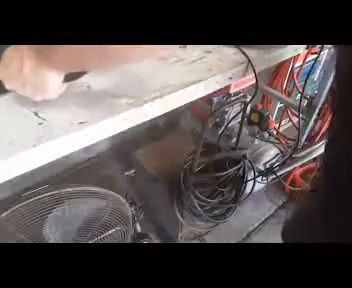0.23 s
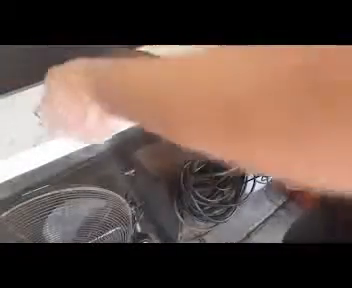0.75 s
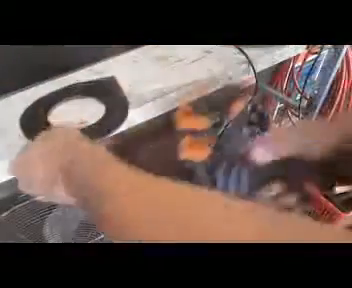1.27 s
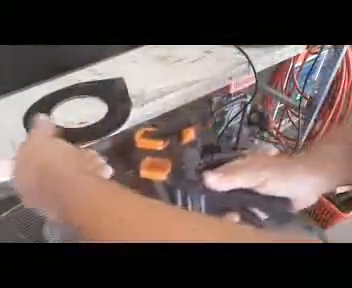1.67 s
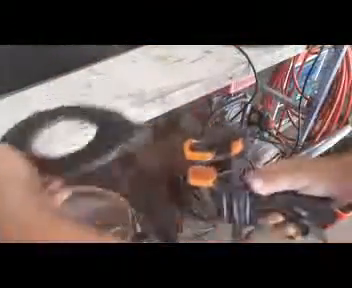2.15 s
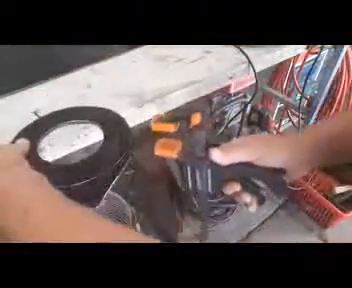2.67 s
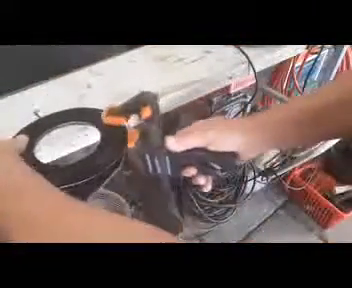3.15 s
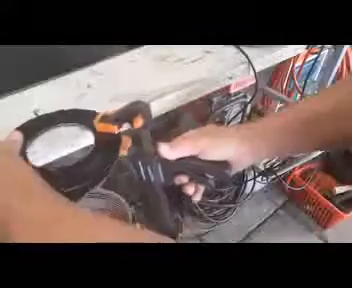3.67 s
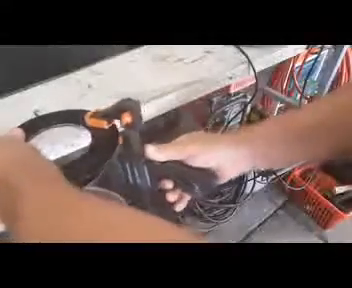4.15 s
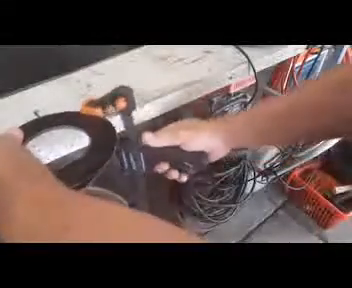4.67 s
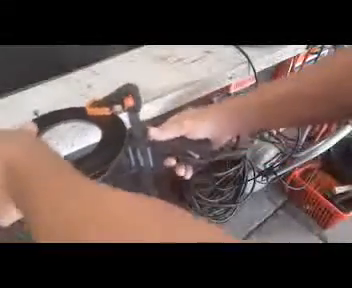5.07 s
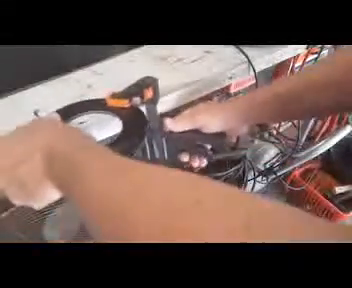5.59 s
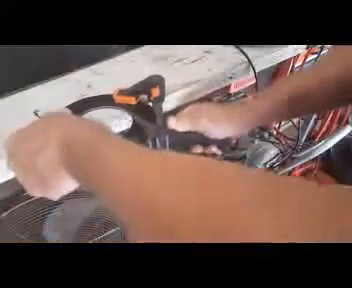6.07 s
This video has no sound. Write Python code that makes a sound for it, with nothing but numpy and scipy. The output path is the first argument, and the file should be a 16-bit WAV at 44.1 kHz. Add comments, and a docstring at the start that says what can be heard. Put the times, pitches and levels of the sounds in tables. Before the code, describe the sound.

Short juddering metal scrape with a squeal, scattered clamp clicks and bench knocks, one loud jaw snap, then soft rubs over faint hum and bird chirps.

```python
"""Metal plate and clamp on a workbench

A cut metal plate is dragged over a wooden bench: shaped noise makes its rasp and grit, slip cycles its judder,
and sine waves at its own pitches its squeal. A plastic bar clamp clicks, slides and snaps shut: short noise
bursts set the metal ringing, and the bench answers with thuds and a boom. The small workshop rings briefly;
wavering sine waves hum like a motor, air hisses softly, and a bird chirps outside in rising tones.
"""
import sys
import numpy as np
from scipy import signal
from scipy.fft import rfft, irfft, next_fast_len
from scipy.io import wavfile
from scipy.ndimage import uniform_filter1d

SR = 44100
rng = np.random.default_rng(int(sys.argv[2]) if len(sys.argv) > 2 else 0)


def wav_record(signal):
    """Record a signal, one row per channel, as 16-bit PCM in the file named by sys.argv[1]."""
    frames = np.transpose(np.atleast_2d(signal))
    bounded = np.clip(frames, -1, 1)
    # unit amplitude maps onto the largest positive 16-bit level
    quanta = np.round(bounded * 32767).astype(np.int16)
    wavfile.write(sys.argv[1], SR, quanta)


N = 279153
TIME = np.arange(N) / SR  # seconds
HIT_SIZE = 16384  # samples in one hit

# Levels in the tables are those of each source before scene() mixes and pans it.
# plate dragged over the bench; RASP_DB and GRIT_DB are added: [time_s, rasp_level_db, grit_level_db]
PLATE_DRAG = [(0.0, -45.5, -45), (0.068, -45, -45), (0.078, -35, -42), (0.108, -49, -54.5),
              (0.204, -45, -52), (0.228, -55.5, -56.5), (0.298, -58.5, -56), (0.312, -42, -51),
              (0.46, -77.5, -82)]
# moments when the dragged plate sticks and slips: [start_s, strongest_s, end_s, level_db, slips_per_s]
PLATE_JUDDERS = [(-.1, 0.1, 0.14, -33.5, 238), (0.089, 0.096, 0.13, -33.5, 710),
                 (0.112, 0.13, 0.16, -34, 680), (0.097, 0.18, 0.34, -44.5, 232),
                 (0.3, 0.322, 0.375, -43.5, 850), (.33, 0.367, 0.46, -50.5, 239)]
# the plate's own pitches: [pitch_hz, rubbed_level_db, squealing_level_db, fall_by_60_db_s]
PLATE_MODES = [(244, -16, -30, 0.29), (394, -5.5, -45, 0.15), (670.4, -5, -19, 0.34),
               (817.5, 2.5, -15.5, 0.4), (907, -5.5, 1.5, 0.78), (1304, -5.5, -27, 0.44),
               (1740, -12, -31, 0.28), (2190, 2.5, -8.5, 0.25), (2510, -15, -20, 0.15),
               (2860, -10, -22, 0.28), (3276, -9, -10, 0.2), (3510, -14, -20, .2), (3900, -6.5, -19, 0.17),
               (4660, -19, -37, .2), (5130, -12, -37, 0.13)]
# the edge catches and squeals; mode levels are added: [start_s, let_go_s, level_db]
EDGE_SQUEAL = (0.16, .2, -34.3)
# sharp clicks of clamp and plate: [start_s, clack_peak_db, tick_level_db]
SHARP_CLICKS = [(.279, -40, -44.5), (.927, -29, -37), (1.021, -45, -55), (1.046, -32.5, -41),
                (1.072, -38, -39.5), (1.103, -39.5, -49), (1.187, -48, -52), (1.42, -48, -58),
                (1.966, -33.5, -43.5), (2.014, -38.5, -51), (2.102, -45.5, -52), (2.195, -33, -38),
                (2.583, -48, -52.5), (3.045, -35.5, -59), (3.059, -37.5, -46.5), (3.579, -50.5, -72)]
# duller knocks against the bench: [start_s, clack_peak_db, thud_level_db]
BENCH_KNOCKS = [(.304, -34, -45.5), (1.238, -36.5, -46.5), (1.422, -43, -57.5), (2.27, -39, -53),
                (2.297, -35.5, -46.5), (2.447, -21.5, -42), (2.541, -29, -43), (2.591, -37.5, -45.5),
                (2.951, -49, -59), (3.246, -56, -51.5), (3.278, -43, -46), (3.64, -55, -55),
                (3.815, -62, -54), (3.853, -57, -58), (4.109, -60, -58), (4.487, -36, -41.5),
                (4.705, -38.5, -46.5), (4.772, -62, -47), (4.861, -58, -49.5), (5.597, -64.5, -61),
                (5.845, -53, -51), (5.963, -51, -50.5), (6.289, -41, -44.5)]
# sliding strokes: [start_s, hardest_s, end_s, rub_level_db, hiss_level_db, sliding_part]
SLIDING_STROKES = [(.6, 0.638, 0.69, -72, -75, "plate"), (.92, .945, 1.02, -56, -60, "bar"),
                   (.96, 1.11, 1.3, -55, -57, "bar"), (1.28, 1.335, 1.5, -65, -69, "bar"),
                   (1.868, 1.956, 2.13, -65.5, -65, "pad"), (2.095, 2.17, 2.225, -52.5, -45.5, "plate"),
                   (2.19, 2.262, 2.3, -55.5, -52, "plate"), (2.3, 2.43, 2.58, -63, -69, "plate"),
                   (2.6, 2.678, 2.83, -71, -82, "pad"), (3.613, 3.676, 3.97, -84, -69.5, "pad"),
                   (3.99, 4.15, 4.5, -75, -75.5, "pad"), (4.305, 4.35, 4.388, -62, -57, "pad"),
                   (4.338, 4.354, 4.37, -46, -39.5, "pad"), (4.668, 4.705, 4.73, -59, -67, "pad"),
                   (5.014, 5.136, 5.23, -56, -61.5, "pad"), (5.422, 5.453, 5.59, -74, -70.5, "pad"),
                   (5.723, 5.805, 6.01, -65, -74, "pad"), (6.125, 6.28, 6.45, -67, -68.5, "pad")]
# the clamp snaps shut: [start_s, crack_level_db, clatter_level_db, boom_level_db]
JAW_SNAP = (4.3603, -20, -28.5, -26.5)
# the bench top's own pitches: [pitch_hz, level_db, fall_by_60_db_s]
BENCH_MODES = [(121.5, 2.5, 0.2), (176.4, -8.5, 0.36), (241.5, -5, 0.12), (348, -8, 0.24),
               (462, -16, 0.098), (700, -5, 0.074), (754, -2.5, 0.052), (850, -11.5, 0.18), (975, -14, 0.2),
               (1340, -36, 0.2), (1630, -33, 0.22)]
# the own pitches of the clamp's steel bar: [pitch_hz, level_db, fall_by_60_db_s]
BAR_MODES = [(935, 4.5, 0.35), (1504, -3, 0.14), (1750, -3, 0.15), (2270, 1.5, 0.1), (2380, -13, 0.16),
             (2840, -16, 0.49), (3060, 8, 0.13), (3750, -5, 0.14), (3920, -5, 0.14), (4360, -18, 0.12),
             (6330, -8, 0.13), (6850, -6, 0.12)]
# bird calls, before the direct sound and its echoes are blended: [start_s, level_db]
BIRD_CALLS = [(.872, -65), (1.265, -58), (1.476, -62.5), (3.36, -64.5), (4.228, -61), (5.213, -64.5),
              (6.148, -59)]
# spells of a thin distant hiss, around which the level wanders: [start_s, end_s, level_db]
HISS_SPELLS = [(1.493, 2.1, -84.5), (2.1, 2.95, -78.5), (3.82, 4.4, -81), (5.43, 5.95, -77)]
# motor hum, around which the level wanders: [pitch_hz, level_db]
MOTOR_HUM = [(49.5, -72.5), (59, -76.5), (120, -79.5), (181, -77.5), (226, -82.5)]

# Tone colours, each with the columns [frequency_hz, level_db_per_hz]
# thud of the bench
THUD_COLOUR = [(50, -43), (90, -10), (125, 1.5), (180, -0.5), (260, -1), (400, -5.5), (600, -15.5),
               (1200, -46)]
# clack of a sharp click
CLICK_COLOUR = [(200, -9), (450, -3), (700, 6), (1100, -1), (1700, 5), (2500, 0.5), (3600, -2),
                (6000, -25.5)]
# clack of a knock, before harder knocks are brightened
KNOCK_COLOUR = [(200, -22), (420, -5.5), (700, 4.5), (1000, -1.5), (1600, -3), (2300, -8.5), (3300, -24),
                (6000, -41.5)]
# tick at the point of contact
TICK_COLOUR = [(1200, -15.5), (2500, 1), (3500, 0.5), (5000, 0.5), (7000, -0.5), (10000, -2), (15000, -11)]
# crack of the closing jaw
CRACK_COLOUR = [(70, -30), (140, -1.5), (300, -1), (700, -1.5), (1000, -7.5), (1500, -6.5), (2100, -12),
                (2900, -13.5), (4200, -17.5), (6000, -22.5), (9000, -22.5), (15000, -23)]
# rasp of a rubbing surface
RASP_COLOUR = [(60, -15), (140, -5.5), (240, -2), (450, 1), (800, -1.5), (1200, -6.5), (2200, -7),
               (3500, -12.5), (6000, -22), (12000, -39)]
# hiss of the grit
GRIT_COLOUR = [(1200, -17.5), (2800, -7), (4500, -1.5), (6500, -2), (9000, 0), (12000, 1), (15000, -3)]
# room air
AIR_COLOUR = [(25, -22), (50, 3), (90, -2.5), (170, -2.5), (300, -7), (550, -19.5), (830, -13.5),
              (1250, -26), (2400, -21.5), (4000, -32), (7000, -31), (11000, -33.5), (15000, -49)]
# thin distant hiss
THIN_COLOUR = [(2500, -40), (4300, -0.5), (5100, 4), (6200, -3.5), (7500, -16), (12000, -36.5)]

# the microphone's tone: [frequency_hz, gain_db]
MICROPHONE_TONE = [(20, -11.5), (45, 2), (5500, 0.5), (7300, -3), (8000, 0), (8700, 6.5), (10000, 2),
                   (13000, 0), (15500, -7.5)]
# width of the sound: [frequency_hz, side_minus_mid_db]
STEREO_WIDTH = [(60, -23), (125, -20), (250, -13), (500, -4), (1000, 1), (2000, -2), (12000, -1)]
# how long the workshop rings: [frequency_hz, fall_by_60_db_s]
ROOM_DECAY = [(100, .55), (300, 0.5), (800, 0.35), (2000, 0.25), (5000, 0.29), (13000, 0.19)]

TOP_HZ = 15750  # nearly nothing passes above this
RASP_DB, GRIT_DB, GRIT_PAN_DB = 8, 4, -2  # pan: left minus right
SQUEAL_ATTACK_S, SQUEAL_RELEASE_S = 0.0077, 0.0046
AFTER_RING_DB = -19  # free ringing relative to the driven squeal
CLICK_CONTACT_S, CLICK_THUD_DB = 0.0042 * 1.49, -21  # thud relative to the clack
KNOCK_CONTACT_S, KNOCK_TICK_DB = 0.0085 * 1.49, -28.5  # tick relative to the clack
SETTLE_S, SETTLE_DB = 0.028, -9  # middle delay of the softer bump; level relative to the thud
BRIGHTEN = 0.11  # dB per octave for each dB by which a knock's clack exceeds -32 dB
FUMBLE_DB, FUMBLES_PER_S = -64, 3.2  # loudest hand bump
BAR_RING_DB, PLATE_RING_DB = -5, -5.5  # ring of a sliding part relative to its rub
SCRATCHES_PER_S, SCRATCH_S, SCRATCH_DB = 60, 0.0014, -1  # level relative to the rub
CHIRP_S, CHIRP_FROM_HZ, CHIRP_RISE_HZ_PER_S = 0.078, 2250, 8300  # typical call
CHIRP_ROUGH = 0.044  # wander of the pitch, as a share of it
CHIRP_SPREAD = 0.12  # largest share by which length and rise differ from call to call
HISS_ATTACK_S, HISS_RELEASE_S = 0.047, 0.13


def undb(db):
    """Turn decibels into gain."""
    return 10 ** (np.asarray(db) / 20)


def curve(table, column=1):
    """One dB column of a time table, joined by straight lines; silent after its end."""
    rows = np.array(table)
    return np.interp(TIME, rows[:, 0], rows[:, column], right=-np.inf)


def across(points, hz):
    """Read (frequency, value) points, with frequency spaced by octaves."""
    f, value = np.transpose(points)
    return np.interp(np.log(np.maximum(hz, 1)), np.log(f), value)


def unit(x):
    """Scale to an average strength (rms) of 1."""
    return x / np.sqrt(np.mean(x ** 2))


def loudest(x):
    """Scale so that the loudest hundredth of a second has rms 1."""
    power = uniform_filter1d(np.mean(x ** 2, axis=0), SR // 100)
    return x / np.sqrt(power.max())


def colour(x, points):
    """Filter a sound to the given tone colour, without any sound before its start."""
    n = x.shape[-1]
    size = 2 * next_fast_len(n // 2 + 2048)
    gain = undb(across(points, np.fft.rfftfreq(size, 1 / SR)))
    # folding the cepstrum makes the filter respond as early as it can
    cepstrum = irfft(np.log(gain))
    cepstrum[1:size // 2] *= 2
    cepstrum[size // 2 + 1:] = 0
    return irfft(rfft(x, size) * np.exp(rfft(cepstrum)))[..., :n]


def noise(size):
    """Stereo noise, alike at both ears in the bass and wide in the treble."""
    mid, side = rng.standard_normal((2, size))
    side = colour(side, STEREO_WIDTH)
    return np.array([mid + side, mid - side])


def walk(rate):
    """Random wander joined by straight lines, with rms 1; rate is in new values per second."""
    knots = rng.standard_normal(4096)
    return unit(np.interp(TIME * rate, np.arange(len(knots)), knots))


def add(track, sound, start):
    """Mix a sound into the track at a time in seconds."""
    i = max(int(start * SR), 0)
    track[:, i:i + sound.shape[1]] += sound[:, :N - i]


def pan(x, left_db):
    """Place a sound by its left minus right level."""
    return x * undb(np.array([[left_db], [-left_db]]) / 2)


def swell(start, top, end):
    """Pressure that builds to its top and eases off."""
    return np.interp(TIME, [start, top, end], [0, 1, 0])


def hold(start, end, attack, release, t=TIME):
    """Attack, hold and release."""
    rise = 1 - np.exp(-np.maximum(t - start, 0) / attack)
    return rise * np.exp(-np.maximum(t - end, 0) / release)


def ring(hz, t60):
    """One pitch dying away, slightly out of step at the two ears as the stereo width asks."""
    t = TIME[:HIT_SIZE]
    skew = undb(across(STEREO_WIDTH, hz)) * rng.choice([-1, 1]) * np.array([[0.7], [-0.7]])
    return np.sin(2 * np.pi * hz * t + skew) * np.exp(-np.log(1000) * t / t60)


def body(part):
    """How the bar or the plate rings after a tap: the sum of its own pitches."""
    modes = BAR_MODES if part == "bar" else [(hz, db, t60) for hz, db, _, t60 in PLATE_MODES]
    return sum(undb(db) * ring(hz, t60) / np.sqrt(t60) for hz, db, t60 in modes)


def through(response, force):
    """A body ringing under a force."""
    return unit(signal.fftconvolve(force, response, axes=1)[:, :force.shape[1]])


def contact(rise, length):
    """A short rattle of the touching surfaces that swells and dies; times in seconds."""
    t = TIME[:HIT_SIZE]
    return noise(HIT_SIZE) * (1 - np.exp(-t / rise)) * np.exp(-t / max(length, rise))


def bump(db):
    """A soft push on the bench, which answers with a thud."""
    return undb(db) * loudest(colour(contact(rise=0.007, length=0.021), THUD_COLOUR))


def blow(clack_db, thud_db, tick_db, part, spectrum, rise, length, thud_s, tick_s, ring_db):
    """A blow is a tick at the contact, a clack of the struck parts and a slower thud of the bench."""
    clack = colour(contact(rise, length), spectrum)
    clack = unit(clack) + undb(ring_db) * through(part, clack)
    thud = colour(contact(rise * 3, thud_s), THUD_COLOUR)
    tick = colour(contact(rise / 4, tick_s), TICK_COLOUR)
    out = undb(clack_db) * clack / abs(clack).max()
    return out + undb(thud_db) * loudest(thud) + undb(tick_db) * loudest(tick)


def friction(rough_db, grit_db):
    """Uneven slips of rubbing surfaces give a rough force and a grainy hiss."""
    slips = undb(rough_db * np.minimum(walk(190), 1.7))
    grains = undb(grit_db * np.minimum(rng.exponential(size=N), 5))
    return noise(N) * slips, unit(colour(noise(N) * slips * grains, GRIT_COLOUR))


def stick_slip(hz, jitter, rough_db):
    """A nearly periodic catch and release whose pace and strength wander."""
    phase = 2 * np.pi * np.cumsum(hz * (1 + jitter * walk(hz / 2))) / SR
    return unit(np.sin(phase) * undb(rough_db * walk(hz / 3)))


def scratches():
    """A metal edge catches in sparse, very short ticks of uneven strength."""
    when, size = rng.random(N), np.minimum(rng.exponential(size=N), 2)
    catches = (when < SCRATCHES_PER_S / SR) * undb(5 * size)
    fading = signal.lfilter([1], [1, -np.exp(-1 / (SCRATCH_S * SR))], catches)
    return unit(noise(N) * fading)


def reverb(x):
    """Diffuse reflections of the workshop: fading noise in which the bass lingers longest."""
    t = TIME[:SR * 3 // 4]
    spectrum = rfft(noise(len(t) + 1))
    hz = np.fft.rfftfreq(len(t) + 1, 1 / SR)
    band_hz = np.array(ROOM_DECAY)[:, 0]
    tail = 0
    # overlapping bands, each with its own decay
    for share, (_, t60) in zip(np.eye(len(ROOM_DECAY)), ROOM_DECAY):
        band = irfft(spectrum * across(list(zip(band_hz, share)), hz))[:, :len(t)]
        tail = tail + band * np.exp(-np.log(1000) * t / t60)
    tail = tail * (1 - np.exp(-t / 0.0021))
    return signal.fftconvolve(x, tail / np.sqrt(np.sum(tail ** 2) / 2), axes=1)[:, :N]


def background():
    """Wavering sines for the motor hum, with soft room air and a thin distant hiss from noise."""
    hum = 0
    for hz, db in MOTOR_HUM:
        tone = unit(np.sin(2 * np.pi * hz * TIME + 0.21 * walk(10.0)))
        hum = hum + undb(db + 1.7 * walk(6.2)) * tone
    air = unit(colour(noise(N), AIR_COLOUR)) * undb(-70.7 + 1.0 * walk(7.9))
    spells = sum(undb(db) * hold(start, end, HISS_ATTACK_S, HISS_RELEASE_S)
                 for start, end, db in HISS_SPELLS)
    thin = unit(colour(noise(N), THIN_COLOUR)) * spells * undb(1.5 * walk(16))
    return hum + air + thin


def bird():
    """Rising, slightly rough chirps, each a little different, gain an upper voice and are smeared by echoes."""
    out = np.zeros((2, N))
    variations = 1 + CHIRP_SPREAD * rng.uniform(-1, 1, (len(BIRD_CALLS), 2))
    for (start, db), (stretch, steep) in zip(BIRD_CALLS, variations):
        t = TIME[:int(CHIRP_S * stretch * SR)]
        along = t / t[-1]
        pitch = CHIRP_FROM_HZ + CHIRP_RISE_HZ_PER_S * steep * t
        pitch = pitch * (1 + CHIRP_ROUGH * walk(600)[:len(t)])
        phase = 2 * np.pi * np.cumsum(pitch) / SR
        upper_voice = undb(-7) * along * np.sin(1.24 * phase)
        call = (np.sin(phase) + upper_voice) * np.sin(np.pi * along ** 1.2)
        add(out, undb(db) * unit(call)[None], start)
    return 0.32 * out + 0.42 * reverb(out)


def fumbles():
    """Once the clamp is in hand, the hands bump the bench faintly at random."""
    out = np.zeros((2, N))
    first, last = 1.9, N / SR
    for when, size in rng.random((int(FUMBLES_PER_S * (last - first)), 2)):
        add(out, bump(FUMBLE_DB - 7 * size), first + when * (last - first))
    return out


def slides():
    """Strokes swell to their hardest point and ease off; metal scratches and rings, the plastic pad only rubs."""
    force, hiss = friction(rough_db=2.0, grit_db=5.0)
    rasp = unit(colour(force, RASP_COLOUR))
    ticks = scratches()
    scrape = unit(rasp + undb(SCRATCH_DB) * unit(colour(ticks, CLICK_COLOUR)))
    grit = unit(hiss + undb(SCRATCH_DB) * unit(colour(ticks, GRIT_COLOUR)))
    edge = unit(force) + ticks
    parts = {
        "plate": (scrape + undb(PLATE_RING_DB) * through(body("plate"), edge), grit),
        "bar": (scrape + undb(BAR_RING_DB) * through(body("bar"), edge), grit),
        "pad": (rasp, hiss),
    }
    out = np.zeros((2, N))
    for start, hardest, end, rub_db, hiss_db, part in SLIDING_STROKES:
        rub_sound, hiss_sound = parts[part]
        stroke = undb(rub_db) * rub_sound + undb(hiss_db) * hiss_sound
        out += swell(start, hardest, end) * stroke
    return out


def clicks():
    """Short hard contacts that ring the clamp's bar and barely move the bench."""
    out = np.zeros((2, N))
    bar = body("bar")
    for start, db, tick_db in SHARP_CLICKS:
        click = blow(db, db + CLICK_THUD_DB, tick_db, bar, CLICK_COLOUR, rise=0.00024,
                     length=CLICK_CONTACT_S, thud_s=0.02, tick_s=0.0026, ring_db=-11.5)
        add(out, click, start)
    return out


def knocks():
    """Longer contacts ring the plate and thud the bench; the part drops back once with a softer bump."""
    out = np.zeros((2, N))
    plate = body("plate")
    for start, db, thud_db in BENCH_KNOCKS:
        # harder knocks are brighter
        tilt = BRIGHTEN * max(db + 32, 0)
        spectrum = [(hz, level + tilt * np.log2(hz / 700)) for hz, level in KNOCK_COLOUR]
        knock = blow(db, thud_db, db + KNOCK_TICK_DB, plate, spectrum, rise=0.003,
                     length=KNOCK_CONTACT_S, thud_s=0.019, tick_s=0.0039, ring_db=-16.5)
        add(out, knock, start)
        add(out, bump(thud_db + SETTLE_DB), start + SETTLE_S * rng.uniform(0.69, 1.3))
    return out


def clamp_snap():
    """The jaw slams home with a crack, the parts clatter, and the bench top booms just after."""
    start, crack_db, clatter_db, boom_db = JAW_SNAP
    out = np.zeros((2, N))
    crack = colour(contact(rise=0.0011, length=0.007), CRACK_COLOUR)
    clatter = colour(contact(rise=0.0051, length=0.016), KNOCK_COLOUR)
    add(out, undb(crack_db) * loudest(crack), start)
    add(out, undb(clatter_db) * loudest(clatter), start + 0.0044)
    # deeper pitches take longer to build
    boom = sum(undb(db) * ring(hz, t60) * (1 - np.exp(-TIME[:HIT_SIZE] * hz / 1.9))
               for hz, db, t60 in BENCH_MODES)
    # keep the boom's start free of rumble below about 80 Hz
    boom = signal.sosfilt(signal.butter(3, 80, "highpass", fs=SR, output="sos"), boom)
    add(out, undb(boom_db) * loudest(boom) + bump(db=-33), start + 0.00412)
    return out


def squeal():
    """Friction keeps the plate's pitches going; once the edge lets go they ring out freely."""
    start, end, db = EDGE_SQUEAL
    t = TIME[:SR]
    # a clock that wanders slightly bends all pitches together
    drift = np.cumsum(1 + 0.004 * walk(119)[:SR]) / SR
    driven = hold(start, end, SQUEAL_ATTACK_S, SQUEAL_RELEASE_S, t)
    out = np.zeros((2, N))
    for hz, _, mode_db, t60 in PLATE_MODES:
        free = undb(AFTER_RING_DB) * hold(start, end, SQUEAL_ATTACK_S, t60 / np.log(1000), t)
        tone = np.sin(2 * np.pi * hz * drift + rng.uniform(0, 2.3, (2, 1)))
        add(out, undb(db + mode_db) * (driven + free) * tone, 0)
    return out


def plate_drag():
    """The plate rasps over the wood and its grit, and judders where it sticks and slips."""
    force, hiss = friction(rough_db=1.5, grit_db=3.0)
    plate_ring = through(body("plate"), force)
    rasp = unit(unit(colour(force, RASP_COLOUR)) + undb(-13) * plate_ring)
    judder = sum(undb(db) * swell(start, top, end) * stick_slip(hz, jitter=0.06, rough_db=4.0)
                 for start, top, end, db, hz in PLATE_JUDDERS)
    rasp = rasp * undb(RASP_DB + curve(PLATE_DRAG, column=1))
    grit = hiss * undb(GRIT_DB + curve(PLATE_DRAG, column=2))
    return pan(rasp + judder, left_db=3.5) + pan(grit, GRIT_PAN_DB)


def scene():
    """All the handling in the workshop, mostly a little to the left, with its echoes and background."""
    handling = pan(undb(-0.5) * clicks() + slides(), left_db=4.0)
    handling = handling + pan(undb(-1) * knocks() + fumbles(), left_db=4.5)
    close = plate_drag() + pan(squeal() + clamp_snap(), left_db=3.0)
    echoes = reverb(undb(-5.5) * handling + undb(-11.0) * close)
    return handling + close + echoes + pan(bird() + background(), left_db=6.5)


def record(dry):
    """The microphone port dips and then peaks in the treble; the top is cut."""
    top_cut = signal.ellip(10, 0.2, 70, TOP_HZ, fs=SR, output="sos")
    return signal.sosfilt(top_cut, colour(dry, MICROPHONE_TONE))


dry = scene()
out = record(dry)
wav_record(out)
```